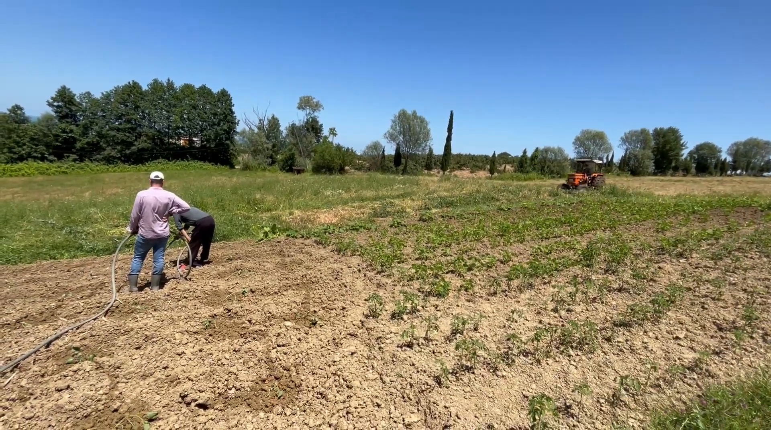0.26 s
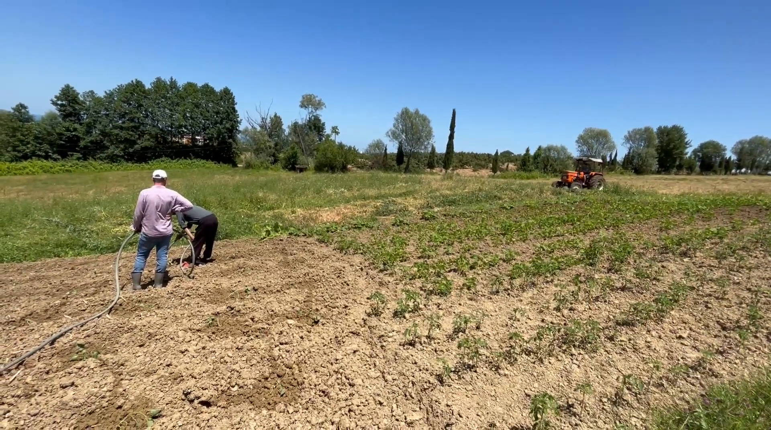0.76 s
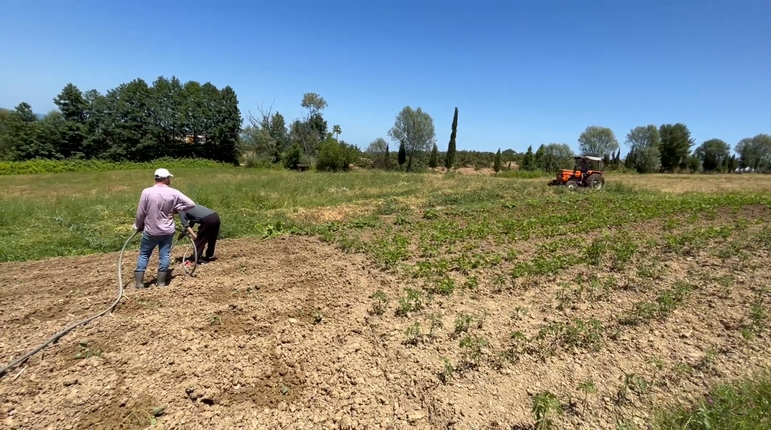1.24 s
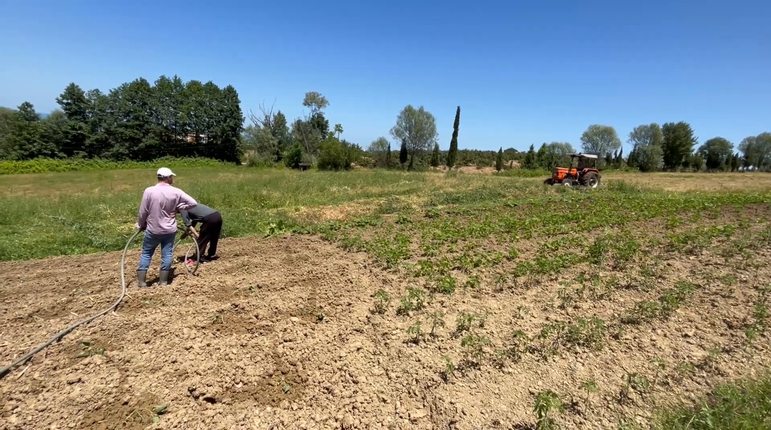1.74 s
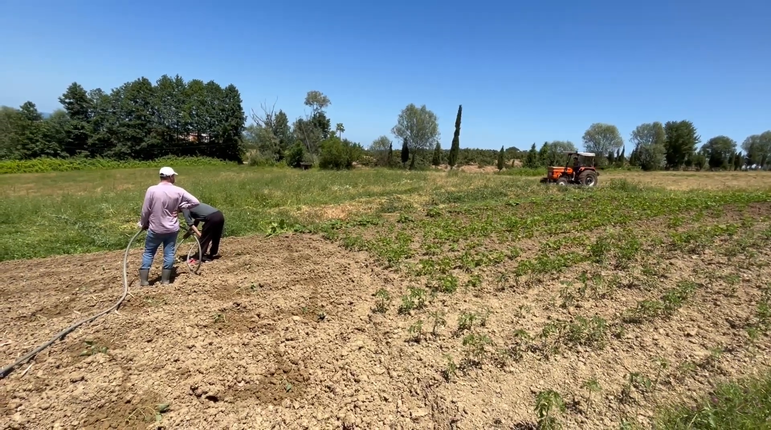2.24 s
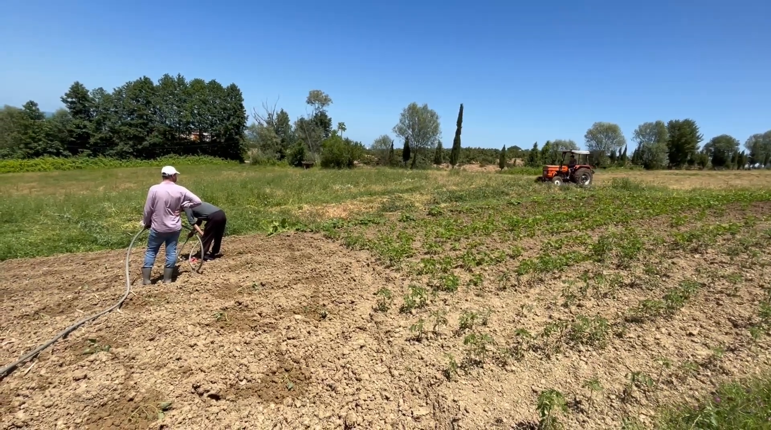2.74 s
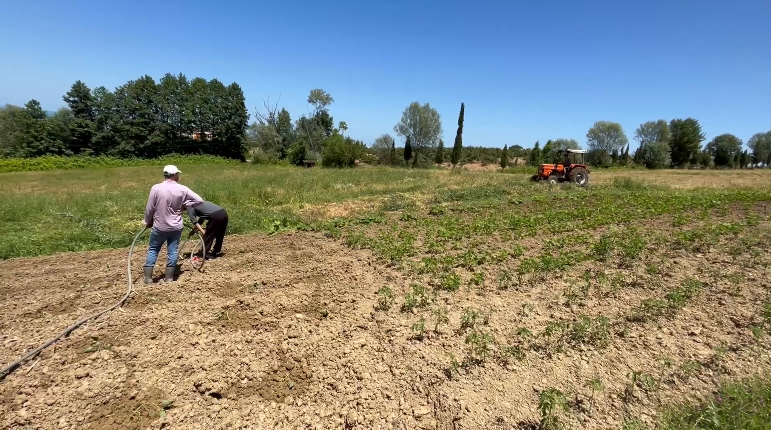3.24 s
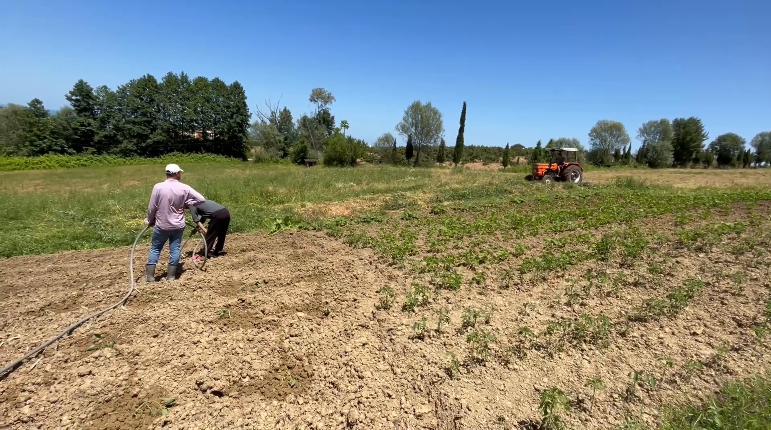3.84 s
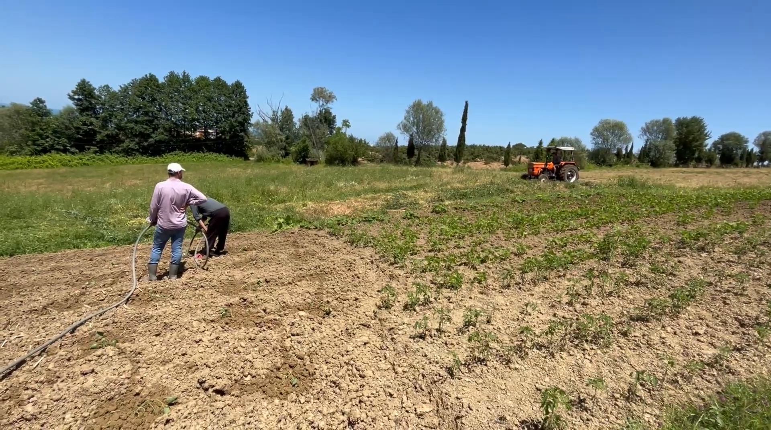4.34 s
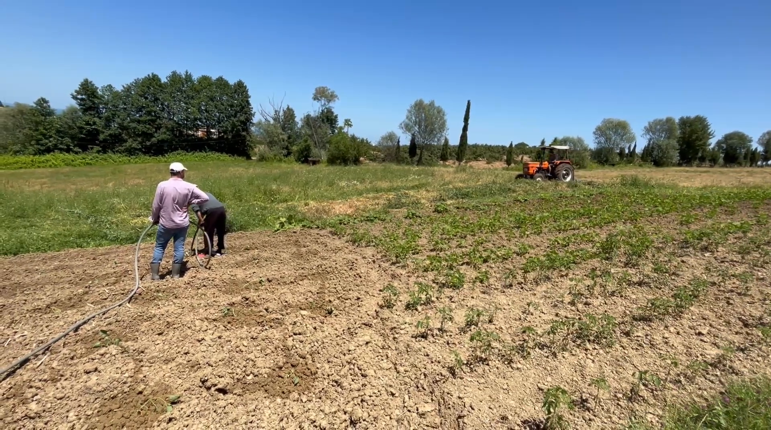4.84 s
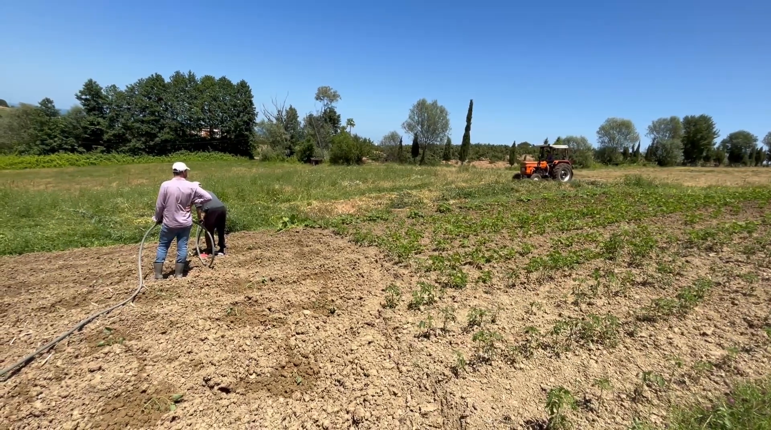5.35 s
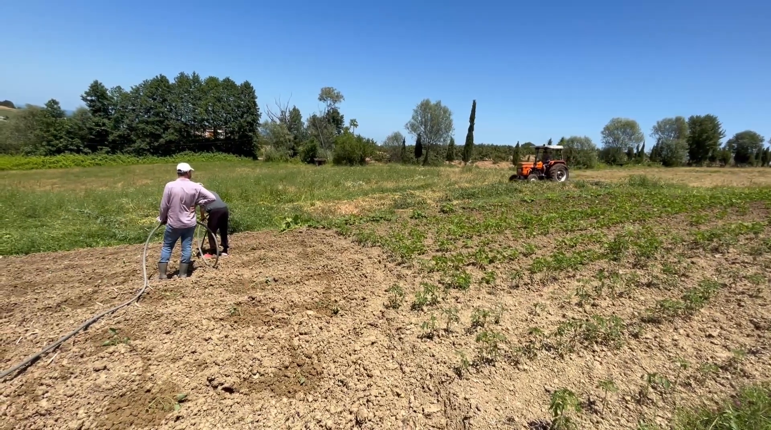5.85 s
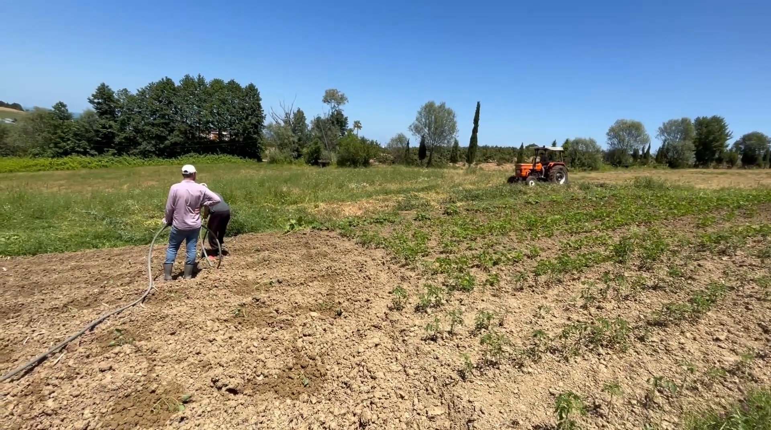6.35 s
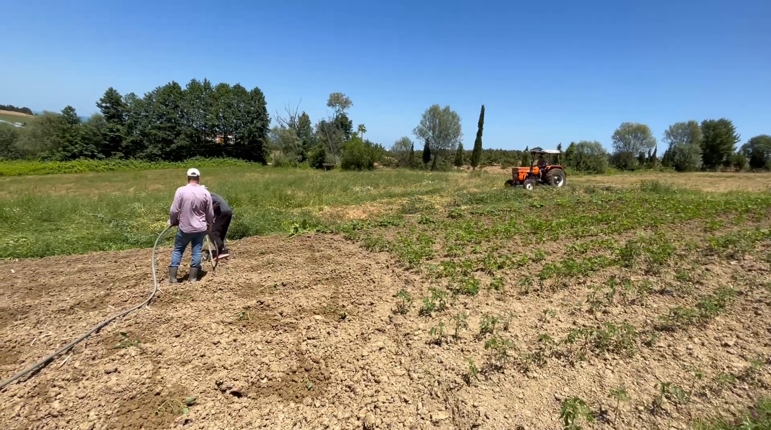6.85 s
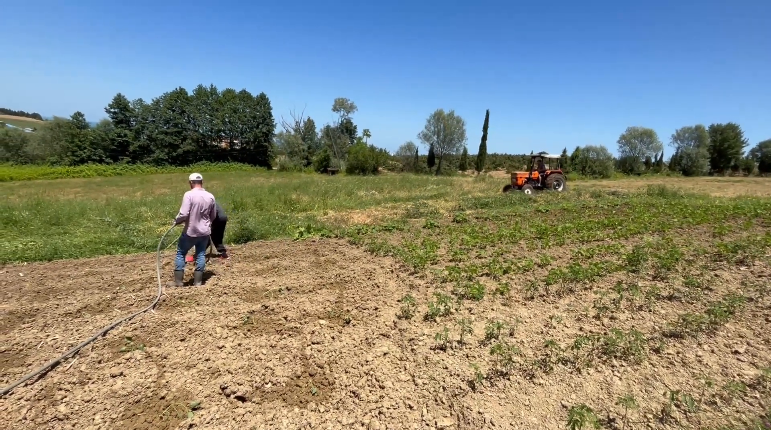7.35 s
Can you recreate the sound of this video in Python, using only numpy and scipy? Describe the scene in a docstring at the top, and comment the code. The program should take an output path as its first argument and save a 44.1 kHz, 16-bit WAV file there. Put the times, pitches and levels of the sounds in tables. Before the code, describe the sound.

A diesel tractor pulls a mower across an open field, some way off and slowly nearing. Its engine clatters steadily with a faint whir, under a soft hiss of cut grass and a few light metal clanks. The low exhaust throb fades on the breeze, returns, then fades again. Wind buffets the microphone with rumbles and thumps early on and again past the middle, mostly on the left, with a weaker gust at the end.

```python
"""A three-cylinder diesel tractor pulls a mower across a field, some way off and slowly nearing.
From the start the exhaust throbs, the block clatters once a firing and a resonance whirs; the mower's
grass hiss opens up over 2 s, and from 1 s bumps clank its deck. Gusts buffet the two microphone ports
at 1.2-2.5 s. The throb fades on the breeze near 2 s and is back by 4 s. More gusts hit at 5.3-6.3 s;
the throb fades again before a last gust at 7.2 s."""
import sys
import numpy as np
from scipy import signal
from scipy.fft import rfft, irfft
from scipy.io import wavfile
from scipy.ndimage import uniform_filter1d, map_coordinates

SR = 44100
rng = np.random.default_rng(int(sys.argv[2]) if len(sys.argv) > 2 else 0)


def materialize(psi):
    """Save the field psi as 16-bit PCM at rate SR to the path in sys.argv[1].

    A 1-D psi becomes a single channel; in a 2-D psi each row is a channel.
    """
    bounded = np.clip(np.atleast_2d(psi).T, -1, 1)
    quanta = np.round(bounded * 32767).astype(np.int16)
    wavfile.write(sys.argv[1], SR, quanta)


N = 334719
TIME_S = np.arange(N) / SR
FREQ_HZ = np.maximum(np.fft.rfftfreq(N, 1 / SR), 1)
PROGRESS = TIME_S / TIME_S[-1]  # 0-1 over the pass
STRAIGHT_ONLY = np.array([[1], [0]])  # mask on a (straight, scattered) pair


def undb(db):
    """Decibels to gain."""
    return 10 ** (np.asarray(db) / 20)


def unit(x):
    """Scale to rms 1."""
    return x / np.sqrt(np.mean(x ** 2))


def curve(table):
    """Time table at every sample."""
    return np.interp(TIME_S, *np.transpose(table))


def by_frequency(table):
    """Points joined on a log-frequency axis."""
    hz, value = np.transpose(table)
    return np.interp(np.log(FREQ_HZ), np.log(hz), value)


def noise():
    """Two independent white noises."""
    return rng.standard_normal((2, N))


def coloured(spectrum):
    """Two independent noises of a given spectrum, rms 1."""
    return unit(irfft(rfft(noise()) * undb(by_frequency(spectrum)), N))


def drift(rate_hz):
    """Random steps, slewed twice; spread near 1."""
    hold = int(SR / rate_hz)
    steps = np.repeat(rng.standard_normal(N // hold + 1), hold)
    return 1.3 * uniform_filter1d(uniform_filter1d(steps, hold), hold)[:N]


def resonances(x, modes):
    """Steep-sided resonances whose powers add."""
    power = sum(undb(db) ** 2 / (1 + ((FREQ_HZ / hz - hz / FREQ_HZ) * hz / width_hz) ** 2) ** 2
                for hz, width_hz, db in modes)
    return irfft(rfft(x) * np.sqrt(power), N)


def noise_band(hz, width_hz):
    """Two noises through one resonance, rms 1."""
    return unit(resonances(noise(), [(hz, width_hz, 0)]))


def turning_body(x, modes):
    """Resonances of a body that turns as it passes: some gain, others fade; rms 1."""
    first = resonances(x, [(hz, width, db - change / 2) for hz, width, db, change in modes])
    last = resonances(x, [(hz, width, db + change / 2) for hz, width, db, change in modes])
    return unit(first + (last - first) * PROGRESS)


# (frequency [Hz], level [dB])
COUNTRY_SPECTRUM = [(8, -10), (30, -27), (60, 2), (140, 1), (210, -1), (240, -19), (400, -11.5), (800, -54)]


def country_hum():
    """Low hum of open country, alike at both ports."""
    return undb(-45) * coloured(COUNTRY_SPECTRUM)[0]


def turbulence(spectrum, window_samples):
    """Rumble at each port, its strength evened out."""
    x = coloured(spectrum)
    power = uniform_filter1d(uniform_filter1d(x ** 2, window_samples), window_samples)
    return x / np.sqrt(power)


# (frequency [Hz], level [dB])
DEEP_RUMBLE_SPECTRUM = [(10, -31), (25, -19), (50, 1), (80, 6), (115, -3), (160, -18.5), (300, -59),
                        (2000, -110)]
UPPER_RUMBLE_SPECTRUM = [(50, -41), (90, -40), (125, 7), (165, 0.5), (205, -1), (255, -19), (360, -16),
                         (520, -30), (1000, -67), (3000, -110)]
# (start [s], end [s], deep rumble [dB], upper rumble [dB])
WIND_GUSTS = [(1.15, 1.46, -30, -47), (1.47, 1.89, -28.5, -28), (1.9, 2.062, -31, -26.5),
              (2.07, 2.16, -44, -34.5), (2.2, 2.46, -41, -40), (5.25, 5.72, -32, -47),
              (5.72, 6.05, -31, -38), (6.07, 6.32, -25, -33.5), (7.2, 7.59, -36, -40)]


def wind(edge_s=0.015, eddy_db=2.5):
    """Gusts of random eddies over a light breeze; the left port takes them harder."""
    eddies = undb(eddy_db * drift(40)) ** 2
    deep_power, upper_power = undb(-46) ** 2, undb(-52) ** 2  # breeze
    for start_s, end_s, deep_db, upper_db in WIND_GUSTS:
        gate = np.clip(.5 + np.minimum(TIME_S - start_s, end_s - TIME_S) / edge_s, 0, 1)
        deep_power += gate * eddies * undb(deep_db) ** 2
        upper_power += gate * eddies * undb(upper_db) ** 2
    deep = np.sqrt(deep_power) * turbulence(DEEP_RUMBLE_SPECTRUM, window_samples=800)
    upper = np.sqrt(upper_power) * turbulence(UPPER_RUMBLE_SPECTRUM, window_samples=600)
    return deep * undb([[-1], [-12.5]]) + upper * undb([[-2.7], [-12]])


# (time [s], length [s], pitch [Hz], level [dB])
EDDY_HITS = [(1.476, .026, 105, -14), (1.497, .014, 170, -20), (1.531, .024, 120, -15),
             (1.7, .025, 125, -24), (1.762, .02, 105, -18), (1.822, .018, 130, -21),
             (1.856, .028, 165, -20.5), (1.943, .016, 85, -12), (1.96, .022, 105, -10),
             (1.993, .018, 125, -17), (2.019, .015, 165, -12.5), (2.035, .016, 165, -20),
             (2.055, .013, 140, -16.5), (2.705, .018, 180, -30), (5.607, .014, 170, -22),
             (5.624, .02, 100, -20), (5.728, .025, 130, -22), (5.812, .022, 105, -18.5),
             (5.973, .025, 150, -21), (6.078, .012, 110, -12), (6.135, .018, 120, -18.5),
             (6.148, .012, 190, -18), (6.168, .014, 110, -19), (6.833, .01, 150, -19),
             (7.19, .016, 160, -26), (7.45, .028, 105, -26)]
# (left gain [dB], right gain [dB])
EDDY_PORTS_DB = [0, -12]


def buffets():
    """Single eddies thump the ports: a few ragged swings of pressure each."""
    out = np.zeros((2, N))
    for port, port_db in enumerate(EDDY_PORTS_DB):
        wander_rad, roughness = .4 * drift(150), undb(2.5 * drift(450))
        for (at_s, length_s, hz, db), phase in zip(EDDY_HITS, rng.random(len(EDDY_HITS))):
            span = slice(int((at_s - 2 * length_s) * SR), int((at_s + 2 * length_s) * SR))
            age_s = TIME_S[span] - at_s
            pressure = np.cos(2 * np.pi * (hz * age_s + phase) + wander_rad[span]) * roughness[span]
            out[port, span] += undb(db + port_db) * np.exp(-(2 * age_s / length_s) ** 2) * pressure
    return out


def nearness(start_m=60, speed_m_s=1.94):
    """Inverse-distance gain of the approaching tractor, 1 at the start."""
    return start_m / (start_m - speed_m_s * TIME_S)


# (time [s], gain [dB])
BREEZE_CARRY = [(0, 0), (1.25, 1.3), (3.0, -0.86), (3.8, -0.1), (4.7, 0.17), (6.0, 1.17), (6.9, -1),
                (7.59, 0.3)]


def breeze_gain(shimmer_db=0.55):
    """Moving air makes clatter and hiss swell and flutter together."""
    return undb(curve(BREEZE_CARRY) + shimmer_db * drift(16))


# (frequency [Hz], left minus right [dB])
PORT_LEVEL_GAP = [(300, 0.5), (480, -1.5), (570, 3), (650, 6.5), (770, 7), (880, 2.5), (1150, 0.5),
                  (1400, 5.5), (1580, 7), (1850, -1), (2150, -2.5), (2600, -1), (5200, 2), (9500, -2)]
# (frequency [Hz], left lead [rad])
PORT_PHASE_GAP = [(400, 0), (570, 1.4), (660, -.4), (900, -1), (1250, -.4), (1450, -1.8), (1700, -.8),
                  (1980, 2.9), (2150, 0), (2450, -3.2), (2680, -.1), (3000, .9), (3400, 2.6), (4100, 6.1),
                  (4700, 6.1), (5800, 3.3), (6800, 6.1), (8100, 6.3), (8700, 8.7), (10300, 9.2),
                  (11400, 6.5)]
# (frequency [Hz], coherence [0-1])
PORT_COHERENCE = [(300, 1), (480, 0.78), (850, 0.7), (1170, 1), (1380, 0.27), (1550, 0.9), (1900, 0.25),
                  (2200, 0), (2450, 0.97), (2900, 0.4), (3400, 0.2), (4200, 0.1), (6000, 0.36),
                  (11000, 0.06)]


def ports(pair):
    """(straight, scattered) to (left, right): the housing shades and delays each port."""
    straight, scattered = rfft(pair)
    coherence = np.clip(by_frequency(PORT_COHERENCE), 0, .99)
    mid = straight * np.sqrt((1 + coherence) / 2)
    side = scattered * np.sqrt((1 - coherence) / 2)
    balance = undb(by_frequency(PORT_LEVEL_GAP))
    half_lead = np.exp(.5j * by_frequency(PORT_PHASE_GAP))
    spectra = np.array([(mid + side) * balance * half_lead, (mid - side) / half_lead])
    left, right = irfft(spectra * np.sqrt(2 / (1 + balance ** 2)), N)
    lead_samples = -0.5 + 0.15 * TIME_S
    left = map_coordinates(left, [np.arange(N) + lead_samples], order=3, mode="nearest")
    return np.array([left, right])


# (time [s], low modes [dB], high modes [dB])
DECK_JOLTS = [(.996, -25.5, -39), (2.931, -25.5, -38), (4.042, -36, -25), (4.516, -43, -28.5),
              (5.127, -33, -25.5), (5.225, -28, -40), (6.442, -27.5, -41), (7.378, -31, -29)]
# (frequency [Hz], level [dB], decay [s])
DECK_LOW_MODES = [(838, 0, .016), (885, -7, .012)]
DECK_HIGH_MODES = [(1060, -7, .012), (1165, 0, .018)]


def deck_clanks(rise_s=.002, detune=.008):
    """Each bump strikes the mower's deck in another place, favouring its low or high modes."""
    out = np.zeros(N)
    age_s = np.arange(SR // 5) / SR
    for at_s, low_db, high_db in DECK_JOLTS:
        start = int(at_s * SR)
        for modes, strike_db in ((DECK_LOW_MODES, low_db), (DECK_HIGH_MODES, high_db)):
            for hz, db, decay_s in modes:
                tone = np.sin(2 * np.pi * hz * (1 + detune * rng.standard_normal()) * age_s)
                envelope = (1 - np.exp(-age_s / rise_s)) * np.exp(-age_s / decay_s)
                out[start:start + len(age_s)] += (undb(strike_db + db) * envelope * tone)[:N - start]
    return out * STRAIGHT_ONLY


# (time [s], level [dB], length [s])
WHIR_SWELLS = [(2.3, -49, 0.34), (4.055, -48.5, 0.7), (4.759, -44.5, 0.26), (5.9, -49.5, 0.27),
               (6.854, -49, 0.26), (7.332, -47, 0.22)]


def resonant_whir(rise_db_per_s=0.4):
    """A resonance near 570 Hz whirs on one wavering note, swelling now and then and slowly growing."""
    pitch_hz = 570 + 2.2 * drift(6) + 3 * drift(50)
    note = np.sqrt(2) * np.sin(2 * np.pi * np.cumsum(pitch_hz) / SR) * undb(2 * drift(21.86))
    whir = note * STRAIGHT_ONLY + 0.84 * noise_band(560.7, width_hz=26)
    base_gain = undb(-56.5 + rise_db_per_s * TIME_S) * nearness()
    swell_power = sum(undb(db) ** 2 * np.exp(-(2 * (TIME_S - at_s) / length_s) ** 2)
                      for at_s, db, length_s in WHIR_SWELLS)
    return whir * np.sqrt(base_gain ** 2 + swell_power)


# (centre [Hz], width [Hz], level [dB], change over the pass [dB])
HISS_BANDS = [(4150, 800, 1.2, -1), (5020, 800, 0.5, 2.5), (5600, 700, -1.8, 2), (6200, 900, -3.6, -1),
              (7100, 1200, -10, -1), (8550, 900, -10, 0), (9400, 1200, -8.8, 0), (11000, 3000, -13.8, 0)]


def grass_hiss(opening_s=1, flutter_db=1.3, flicker_db=1.7):
    """Blades hiss through the stalks, dull at first; each band flutters on its own."""
    tilt_db_per_oct = -2.5 * np.exp(-TIME_S / opening_s)
    tilt_db_per_oct += 0.15 * (TIME_S - TIME_S.mean())  # nearer: the air takes less treble
    hiss = 0
    for hz, width_hz, db, change_db in HISS_BANDS:
        waver_db = flutter_db * drift(14) + flicker_db * drift(120)
        band_db = db + change_db * (PROGRESS - .5) + waver_db + tilt_db_per_oct * np.log2(hz / 5000)
        hiss += noise_band(hz, width_hz) * np.sqrt(width_hz) * undb(band_db)
    return unit(hiss) * undb(-48.5)


# (time [s], firing rate [Hz])
ENGINE_SPEED = [(0, 33.42), (.85, 34.15), (1.3, 33.49), (2.8, 32.67), (3.15, 33.2), (3.7, 31.99),
                (4.25, 33.23), (4.55, 31.56), (5.0, 32.39), (5.45, 30.81), (5.85, 32.21), (6.15, 32.3),
                (6.55, 31.24), (7.05, 32.68), (7.59, 32.12)]


def firing_count():
    """Firings elapsed; the engine hunts under load."""
    return np.cumsum(curve(ENGINE_SPEED)) / SR


# per cylinder: (knock level [dB])
CYLINDER_KNOCK_DB = [7, 12.5, 8]
CYLINDERS = len(CYLINDER_KNOCK_DB)


def blows(firings, decay_firings, scatter_db, blur_samples=250):
    """Envelope of one blow a firing, blurred by distance; unequal cylinders make it lope."""
    index = firings.astype(int)
    blow_db = np.array(CYLINDER_KNOCK_DB)[index % CYLINDERS]
    blow_db = blow_db + scatter_db * rng.standard_normal(index.max() + 1)[index]
    envelope = undb(blow_db) * np.exp(-(firings % 1) / decay_firings)
    return unit(uniform_filter1d(envelope, blur_samples))


def cam_noise(firings, share, points=4096):
    """Mechanical noise; a share of the straight signal's power repeats every camshaft turn."""
    pattern = unit(irfft(np.exp(2j * np.pi * rng.random(points // 2 + 1))))
    position = firings / CYLINDERS % 1 * points
    repeating = unit(np.interp(position, np.arange(points), pattern))
    return np.sqrt(share) * repeating * STRAIGHT_ONLY + np.sqrt([[1 - share], [1]]) * noise()


# block and panels: (frequency [Hz], width [Hz], level [dB], change over the pass [dB])
CASING_MODES = [(655, 30, -5.5, 4), (711, 43, -4, 7.5), (740, 315, -7.5, 2), (828, 72, -2.5, 4),
                (885.6, 54, 1.2, -3.5), (946, 59, -3.5, -0.5), (1053, 77, -2, 2.5), (1110, 17, -0.5, 8.5),
                (1156, 26, 0.5, 2.5), (1199, 22, -0.5, -1), (1251, 180, -5.5, -5), (1500, 47, -2.5, 2.5),
                (1554, 30, -5, 1), (1551, 383, -6.5, 3.5), (1874, 142, -12, 11), (1990, 91, -14, -15.5),
                (2178, 152, -9.5, -5), (2610, 170, -16, 4.5), (2882, 387, -9, -4), (3550, 670, -17.5, -1)]


def engine_clatter(firings, split_hz=1750):
    """Combustion knocks ring the block over the rush of gears and fan; thin panels rattle higher."""
    block_modes = [mode for mode in CASING_MODES if mode[0] < split_hz]
    panel_modes = [mode for mode in CASING_MODES if mode[0] >= split_hz]
    knocks = cam_noise(firings, share=0.45) * (6 + blows(firings, decay_firings=0.9, scatter_db=3))
    load_db = 0.13 * np.cos(2 * np.pi * firings / CYLINDERS)  # one cycle per two crank turns
    block = turning_body(knocks, block_modes) * undb(-37.5 + load_db + 0.57 * drift(9))
    rattle = cam_noise(firings, share=0.17) * (3 + blows(firings, decay_firings=0.64, scatter_db=3.5))
    panels = turning_body(rattle, panel_modes) * undb(-43 + 1.14 * drift(25))
    return block + panels


# (frequency [Hz], width [Hz], level [dB], change over the pass [dB])
SILENCER_MODES = [(272, 59, -6, 10.5), (303, 51, 1, -1), (337.7, 26.5, -1.5, 1), (427, 188, -10.5, -2.5),
                  (477, 25, -10.5, 4.5)]


def silencer_boom(firings):
    """Puffs of gas boom in the silencer."""
    puffs = cam_noise(firings, share=0.27) * (3 + blows(firings, decay_firings=0.18, scatter_db=1))
    return turning_body(puffs, SILENCER_MODES) * undb(-43 + 0.5 * drift(4))


# (order [x firing rate], level [dB], change over the pass [dB])
EXHAUST_HARMONICS = [(1, -18, -3), (2, -1.6, -1), (3, -5.5, 2), (4, -19.5, 5), (5, -25.5, 0), (6, -23, 3),
                     (7, -25, 0), (9, -16, 0.5)]
# (frequency [Hz], level [dB])
GAS_RUSH_SPECTRUM = [(8, -24), (25, -24), (40, -4), (55, 5.5), (85, 0), (115, -9), (170, -32), (250, -14),
                     (600, -67)]
# (time [s], level [dB])
THROB_LEVEL = [(0, -32.5), (0.6, -32), (0.95, -34), (1.25, -31), (1.85, -34), (2.15, -46.5), (2.65, -45),
               (3.45, -47.5), (3.88, -33.8), (4.35, -35.5), (4.55, -31.5), (5.05, -34.5), (5.3, -30),
               (5.65, -30), (5.85, -36), (6.4, -32), (6.7, -40.5), (7.15, -44.5), (7.59, -44)]


def exhaust_throb(firings):
    """Uneven firing harmonics over a rush of tailpipe gas, swelling and fading on the breeze."""
    tone = 0
    for order, db, change_db in EXHAUST_HARMONICS:
        pipe_rad = .5 * order ** 2  # the pipe's delay rounds each puff
        waver_rad, waver_db = .12 * drift(20), .8 * drift(7)  # moving air
        gain = undb(db + change_db * (PROGRESS - .5) + waver_db)
        tone += gain * np.cos(2 * np.pi * order * firings + pipe_rad + waver_rad)
    gas = undb(-13) * coloured(GAS_RUSH_SPECTRUM)[0]
    strokes = unit(tone) * undb(0.5 * drift(30))
    return (strokes + gas) * undb(curve(THROB_LEVEL))


def scene():
    """Tractor and mower far off, wind close by."""
    firings = firing_count()
    carried = (engine_clatter(firings) + grass_hiss()) * breeze_gain()
    approaching = (silencer_boom(firings) + carried) * nearness()
    machinery = ports(approaching + resonant_whir() + deck_clanks())
    return exhaust_throb(firings) + machinery + wind() + buffets() + country_hum()


def record(dry):
    """The recorder cuts the top."""
    cutoff_hz = 11850
    return signal.sosfilt(signal.ellip(10, .2, 80, cutoff_hz, fs=SR, output="sos"), dry)


dry = scene()
out = record(dry)
materialize(out)
```